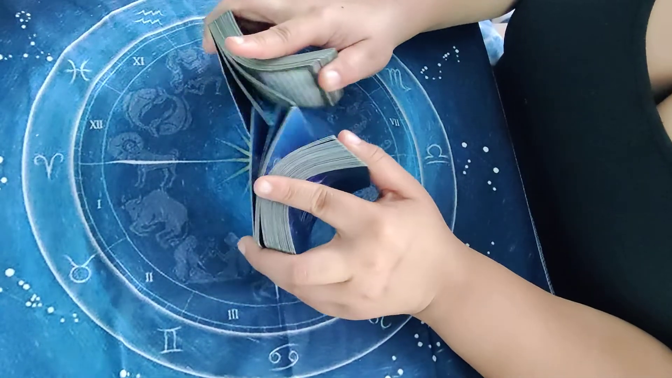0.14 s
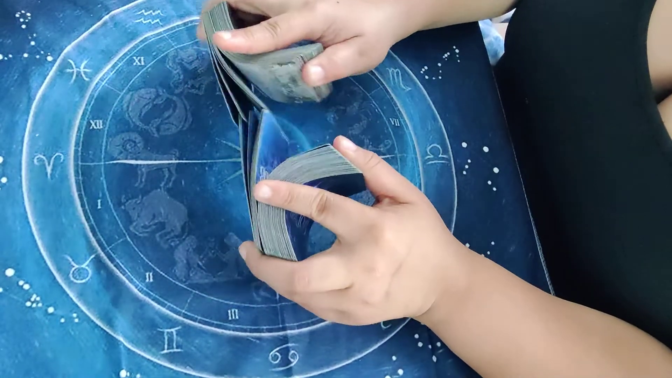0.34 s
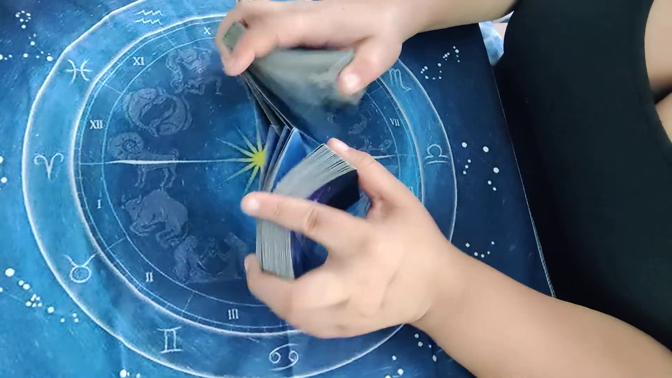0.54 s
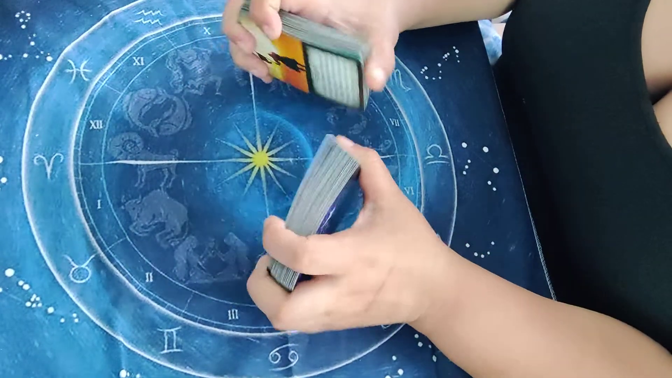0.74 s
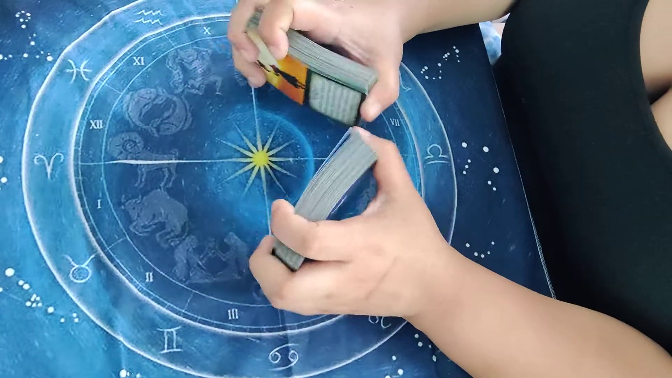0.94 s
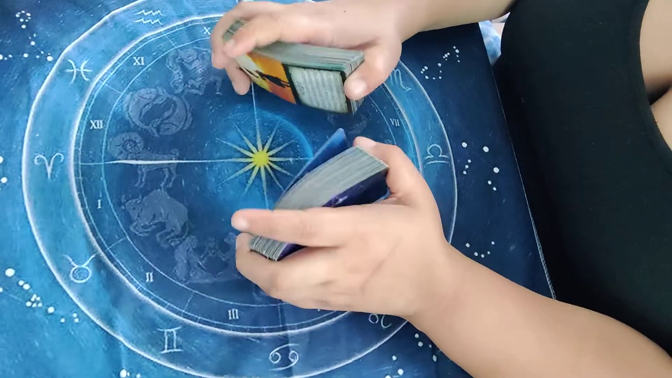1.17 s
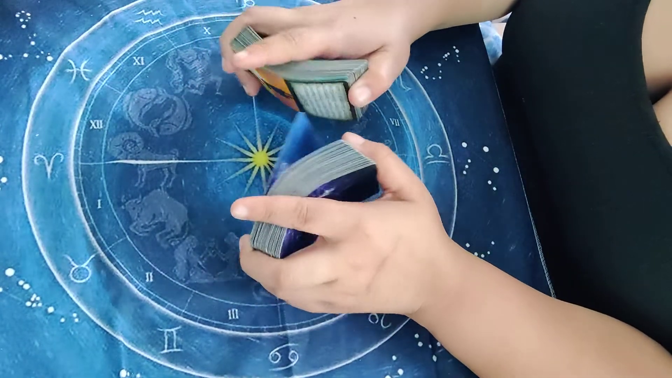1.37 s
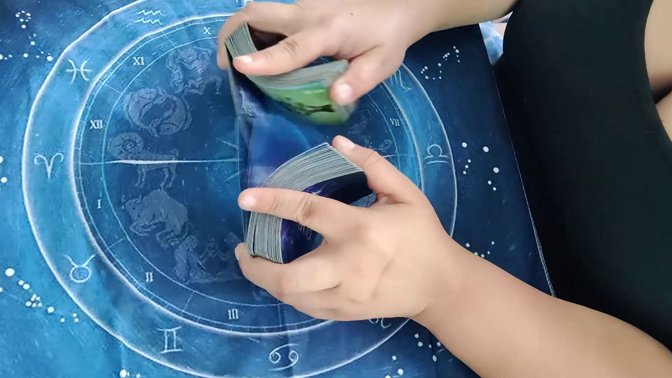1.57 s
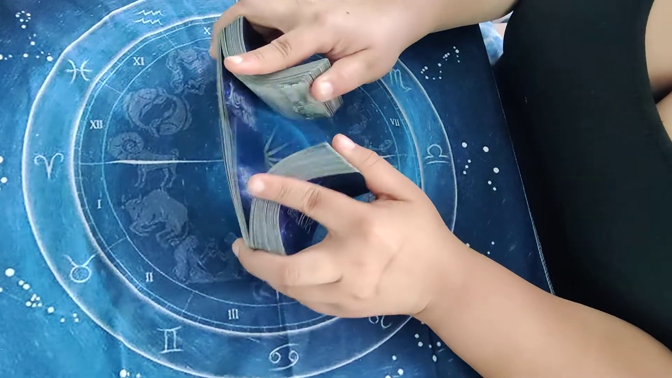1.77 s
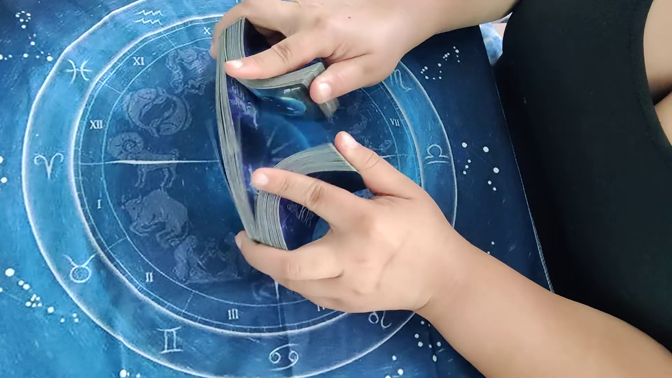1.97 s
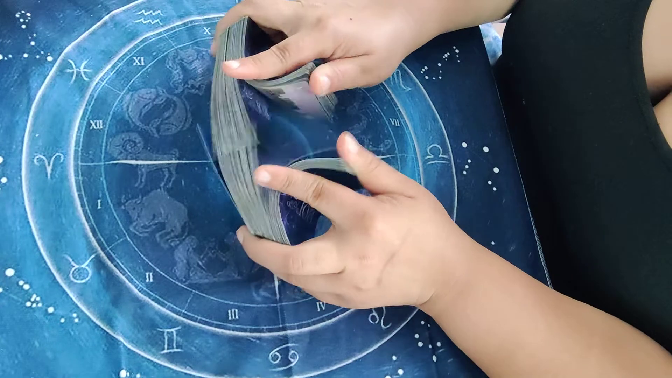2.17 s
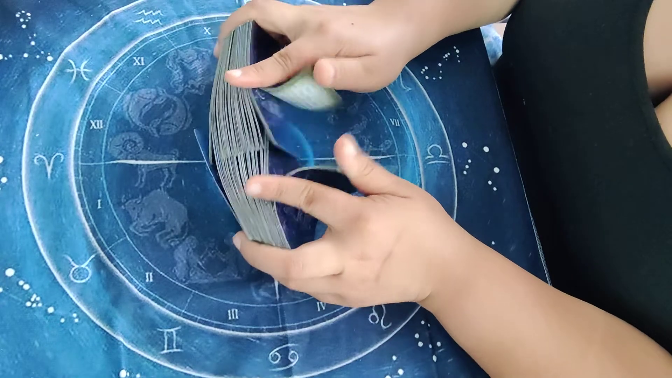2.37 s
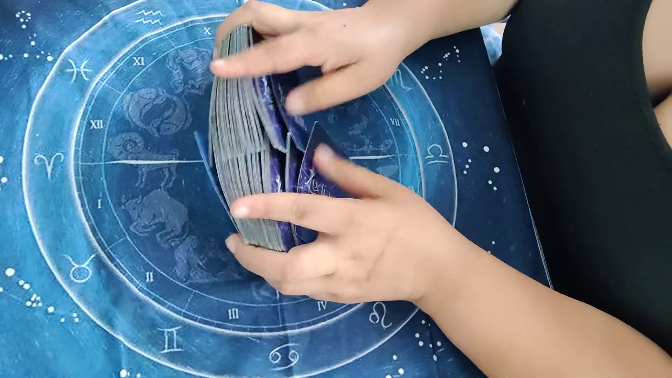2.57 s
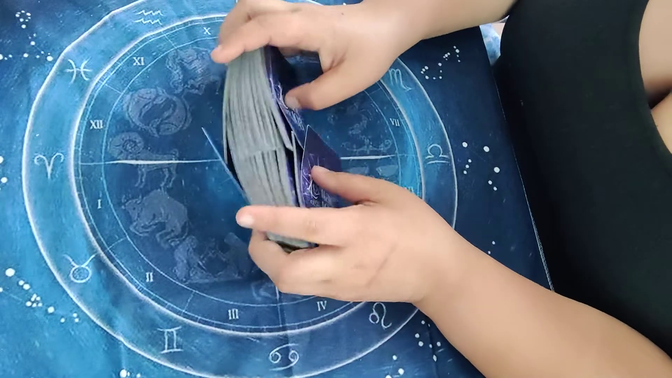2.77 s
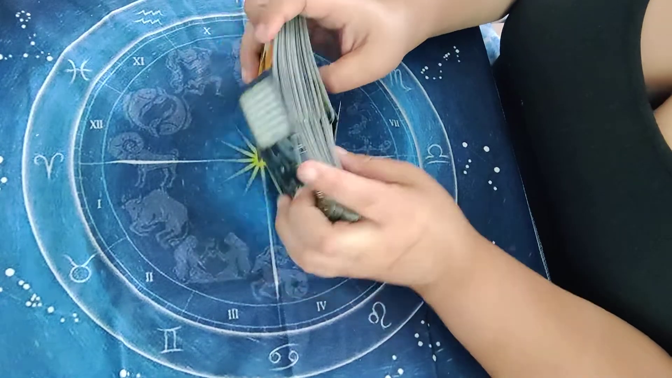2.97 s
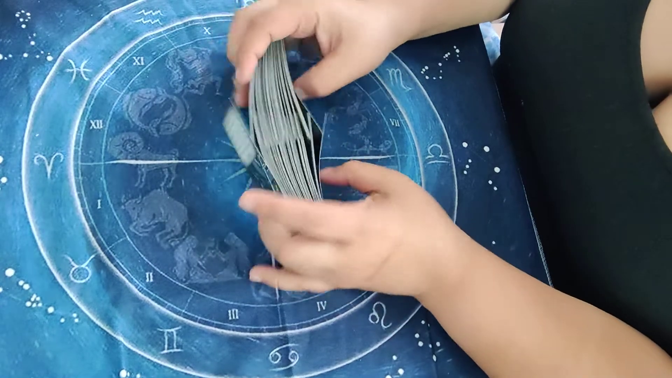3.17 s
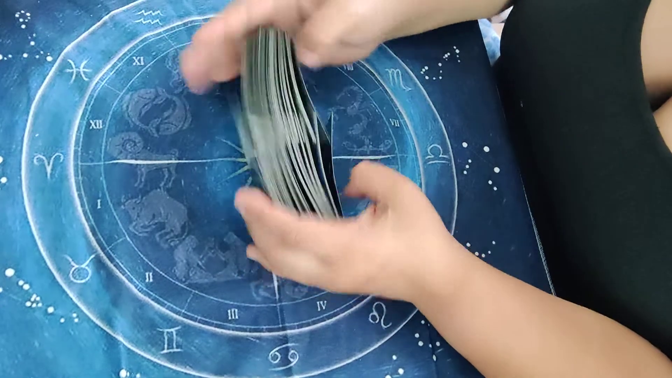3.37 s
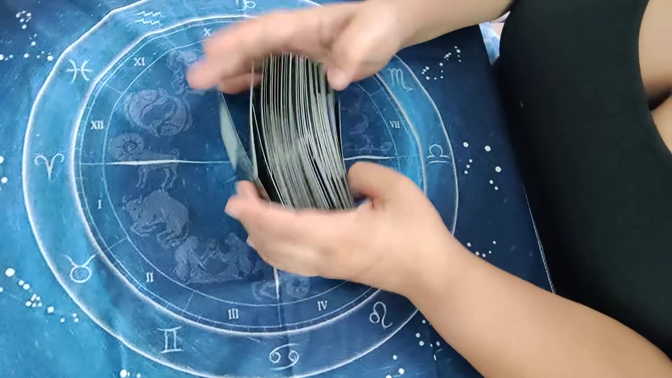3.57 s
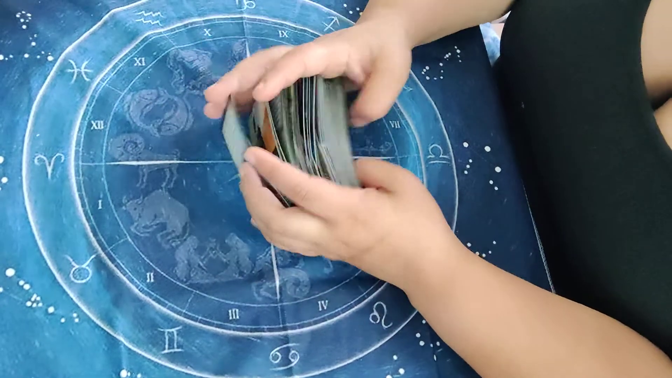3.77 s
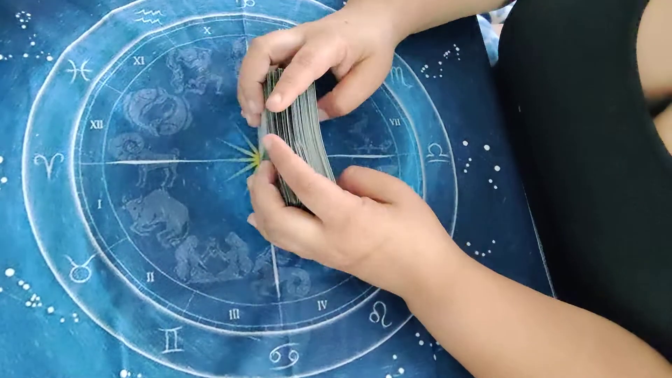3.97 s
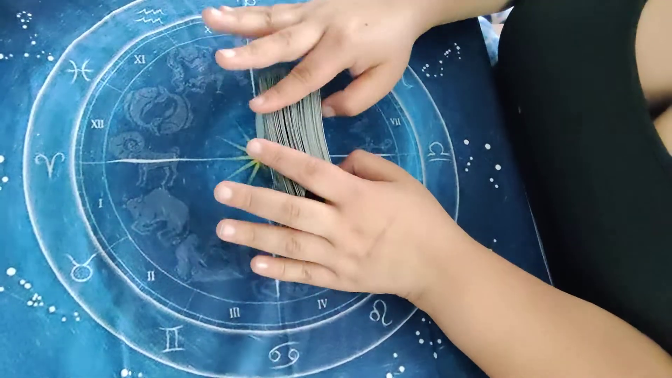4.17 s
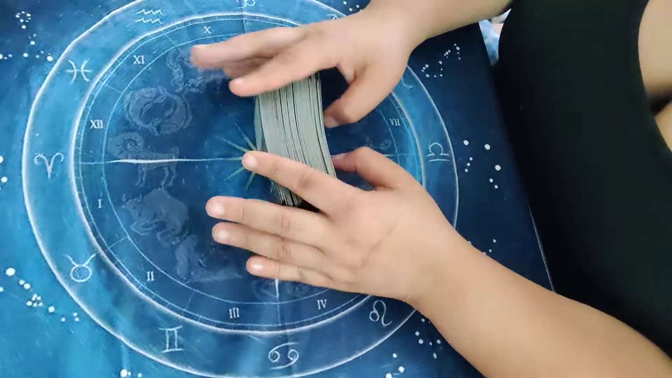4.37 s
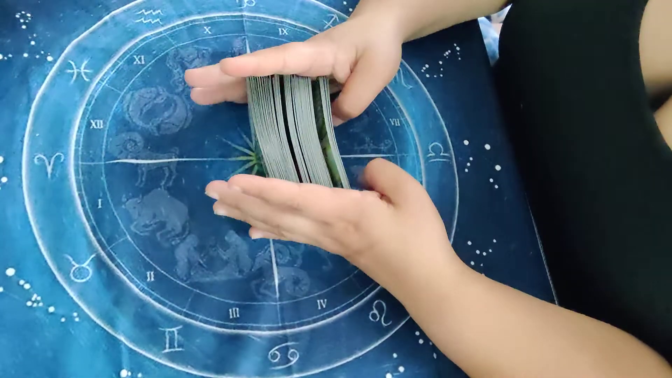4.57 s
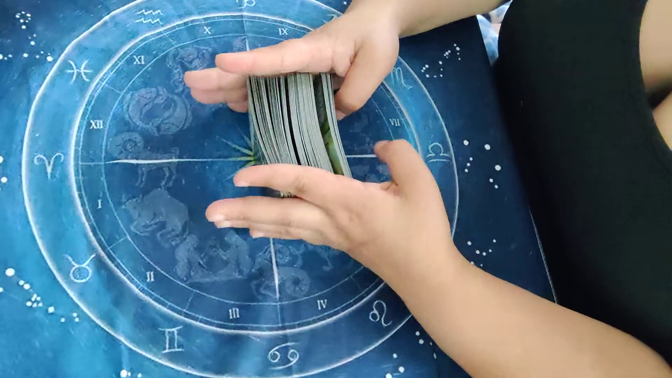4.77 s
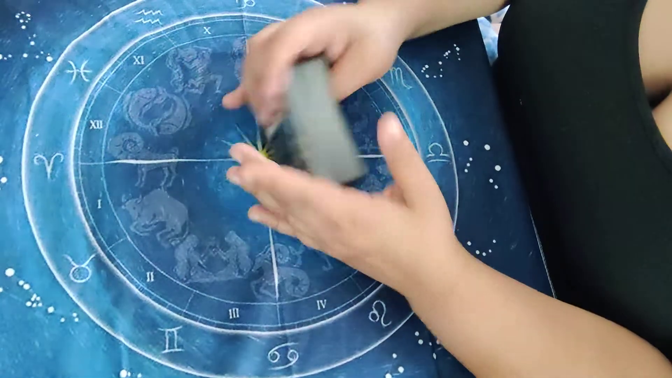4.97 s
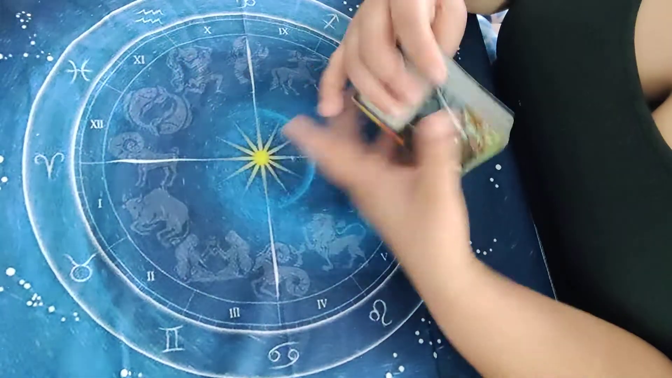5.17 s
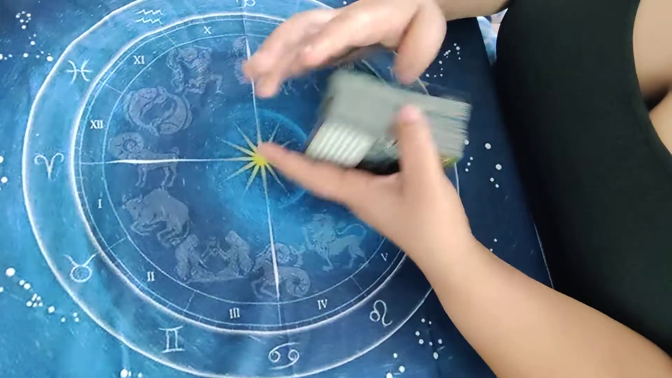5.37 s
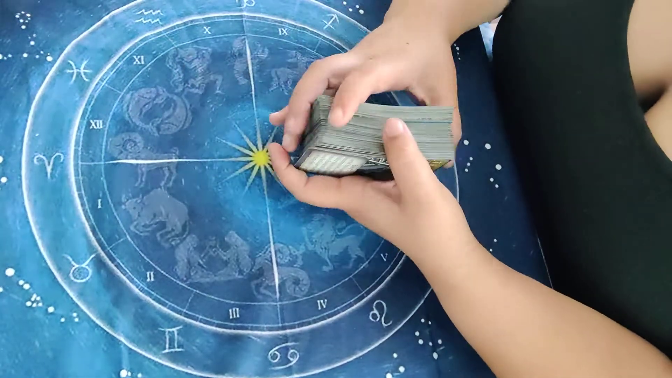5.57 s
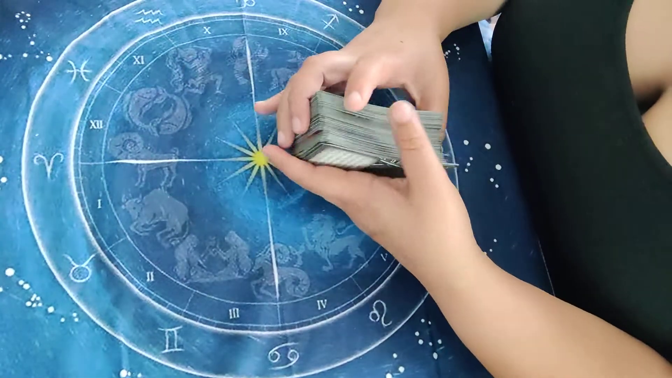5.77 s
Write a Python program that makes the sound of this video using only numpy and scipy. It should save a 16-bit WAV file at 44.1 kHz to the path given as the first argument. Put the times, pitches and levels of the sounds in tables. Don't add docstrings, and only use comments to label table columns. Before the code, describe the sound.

Two hands shuffle a thick deck over a cloth-covered table: brief crisp flicks, near silence, more scattered flicks, then a rapid rattling riffle that ends abruptly. Soft knocks and short card hisses follow as the packets are pressed together, then faint taps, small corner clicks and creeping fingers. Recorded close and dry, with brief hard-walled reflections and a barely audible low hum.

```python
import sys
import numpy as np
from scipy import signal
from scipy.fft import rfft, irfft
from scipy.io import wavfile
from scipy.ndimage import uniform_filter1d

SR = 44100
rng = np.random.default_rng(int(sys.argv[2]) if len(sys.argv) > 2 else 0)


def gain_from_decibels(decibels):
    exponent = np.asarray(decibels, float) / 20
    return 10 ** exponent


def master_out(mix):
    frames = np.transpose(np.atleast_2d(mix))
    ceiling = np.clip(frames, -1, 1)
    pcm = np.round(ceiling * 32767).astype(np.int16)
    wavfile.write(sys.argv[1], SR, pcm)


N = 257257


def evened(x):
    return x / np.sqrt(np.mean(x ** 2) + 1e-20)


def read(points, hz):
    f, value = np.transpose(points)
    return np.interp(np.log(hz + 1), np.log(f + 1), value)


def at(table, s):
    time_s, *columns = np.transpose(table)
    return [np.interp(s, time_s, column) for column in columns]


def add(mix, s, sound):
    part = mix[round(s * SR):][:len(sound)]
    part += sound[:len(part)]


def resonate(x, hz, width_hz):
    turn = np.exp(2j * np.pi * np.cumsum(hz * np.ones(len(x))) / SR)
    r = np.exp(-np.pi * abs(width_hz) / SR)
    return 2 * (turn * signal.lfilter([1 - r], [1, -r], x / turn)).real


def resonate_twice(x, hz, width_hz):
    return resonate(resonate(x, hz, width_hz), hz, 2 * width_hz)


def ring(x, modes):
    y = sum((-1) ** k * gain_from_decibels(db) * resonate(x, hz, width_hz) for k, (hz, width_hz, db) in enumerate(modes))
    return y / np.sqrt(uniform_filter1d(y ** 2, size=88).max())


def coloured(x, points):
    return evened(irfft(rfft(x) * gain_from_decibels(read(points, np.fft.rfftfreq(len(x), 1 / SR))), len(x)))


def burst(noise, rise_s, fall_s, spiky):
    t = np.arange(len(noise)) / SR - 3 * rise_s
    shape = np.where(t < 0, np.exp(-.5 * (t / rise_s) ** 2), np.exp(-t / fall_s))
    return shape * noise * abs(noise) ** spiky


def grainy(noise, grain, spread_db, limit):
    steps = np.minimum(rng.exponential(1, N // grain + 1), limit)
    return noise * gain_from_decibels(spread_db * steps).repeat(grain)[:N]


def stroke(s, rise_s, fall_s, db):
    end_db, bend = -24.5, 1.279
    t = np.arange(N) / SR - s
    away = np.where(t < 0, -t / rise_s, t / fall_s)
    return gain_from_decibels(db + end_db * np.minimum(away, 3) ** bend)


def drone():
    # (time [s], level [dB])
    load = [(0.0, -80.5), (0.1, -67.5), (0.41, -58.5), (0.83, -71.5), (1.2, -60.5), (1.56, -77), (1.7, -54),
            (2.22, -56), (2.269, -64.5), (2.58, -53.5), (3.04, -79), (3.09, -67.5), (3.23, -71),
            (3.31, -53.5), (3.39, -64), (4.97, -72), (5.54, -58), (5.83, -66)]
    # (frequency [Hz], width [Hz], level [dB])
    fuzz = [(123.62, 9.3, -73.5), (167.89, 13, -78), (252.5, 4, -74.5), (275.85, 5.3, -75)]
    # (frequency [Hz], density [dB per Hz])
    air = [(30, -16), (76, -4), (101, -1.5), (167, -13), (261, -8), (332, -16.5), (443, -15), (562, -23),
           (1420, -27.5), (1840, -29), (7280, -40), (12300, -47), (13500, -59)]
    tone_hz, waver_hz, waver_db = 85.764, 1.2, 1.8
    air_db, bands_waver_db, bands_follow = -69, 3, .3
    sway = [evened(uniform_filter1d(uniform_filter1d(v, size=1500), size=1500))
            for v in rng.standard_normal((2, N))]
    load_db, = at(load, np.arange(N) / SR)
    level = gain_from_decibels(load_db + waver_db * sway[0])
    phase = 2 * np.pi * np.cumsum(tone_hz + waver_hz * sway[1]) / SR
    tone = np.sqrt(2) * level * np.sin(phase)
    noise = rng.standard_normal((2, N))
    bands = sum(gain_from_decibels(db) * evened(resonate_twice(noise[0], hz, width_hz)) for hz, width_hz, db in fuzz)
    bands = bands * gain_from_decibels(bands_waver_db * sway[0] + bands_follow * (load_db - load_db.mean()))
    return tone + bands + gain_from_decibels(air_db) * coloured(noise[1], air)


def card(slip, crack, hz, slap_db, snap_db, fizz_db, thud_db, width_hz, bend, lower_db, first_db, second_db):
    # (frequency [Hz], width [Hz], level [dB])
    corners = [(4513, 750, 0.5), (5526, 790, 1.5), (6803, 800, 0)]
    edge = ring(resonate_twice(slip, hz, 1300), [(hz, width_hz, 0)])
    low_hz = .8 * hz
    edge = edge - gain_from_decibels(lower_db) * ring(resonate_twice(slip, low_hz, 900), [(low_hz, 400, 0)])
    high_pass = signal.butter(3, 500, "high", fs=SR, output="sos")
    thin = signal.sosfilt(high_pass, resonate(slip, 550, 2100))
    slap = ring(thin, [(615.05 * hz / 2700, 560, 0), (1500, 700, 0)])
    thud = ring(resonate(slip, 280, 710), [(134.0, 290, 0.27), (386.0, 900, -2.5)])
    modes = [(corner_hz * bend, corner_width_hz, db + more_db)
             for (corner_hz, corner_width_hz, db), more_db in zip(corners, (first_db, second_db, 0))]
    snap = ring(resonate(crack, 6400 * bend, 6100), modes)
    fizz = resonate(resonate(crack, 9700, 7900), 11000, 11000)
    fizz = ring(fizz, [(8973, 3000, 1.4), (16740, 3700, 1.2)])
    return edge + gain_from_decibels(slap_db) * (slap + gain_from_decibels(thud_db) * thud) - gain_from_decibels(snap_db) * snap + gain_from_decibels(fizz_db) * fizz


def flicks():
    # (time [s], edge ring [dB], ring [Hz], slap re ring [dB], snap re ring [dB])
    first_try = [(.068, -65, 2538, -9.5, -7), (.1245, -58.5, 2300, -7.5, 0.5),
                 (.1405, -25.5, 2950, -4, -3.5), (.1472, -21, 2889, -13, -23),
                 (.155, -25.5, 2950, -22.5, -9), (.1605, -27, 2892, -22.5, -14),
                 (.1701, -18, 2900, -15.5, -10), (.1925, -19, 2870, -10.5, -8.5),
                 (.2125, -23.5, 2870, -11.5, -4), (.229, -18, 2674, -5.5, 6), (.2395, -28, 2250, -15, -2.5),
                 (.2677, -26.5, 2448, -11.5, -1.5), (.292, -25, 2717, -1.5, -1),
                 (.301, -34, 2280, -16, -7.5), (.3108, -28.5, 2639, -9, -2.5),
                 (.3531, -52.5, 3034, -13, -15), (.3635, -44.5, 2455, 9.5, -10.5),
                 (.394, -40.5, 2770, -16, -0.5), (.4048, -11, 2609, -8, -9.5),
                 (.4155, -25, 2650, -14, -8.5), (.6267, -60, 2853, -5.5, -10), (.6364, -46, 2529, -9, -9.5),
                 (.645, -57, 2240, -22.5, -9.5), (.7175, -53, 2820, -22, -21),
                 (.7294, -51, 2800, -11.5, 0.5)]
    second_try = [(1.631, -56.5, 2524, 0.5, 0.5), (1.6483, -19.5, 2925, -14.5, -2.5),
                  (1.6895, -30.5, 2930, -8.5, -2), (1.6995, -26, 2937, -9, 1), (1.7147, -28, 2737, -12, -8),
                  (1.7541, -20, 2827, -8.5, 0), (1.7713, -45, 2915, -14, -2), (1.814, -36, 2965, -6, 0.5),
                  (1.8197, -38.5, 3147, -9.5, 5.5), (1.8382, -41.5, 2912, 1.5, 3.5),
                  (1.904, -50.5, 1798, -4, -2), (1.9258, -46, 2707, 2, 2.5), (1.936, -51, 2894, -7.5, -1),
                  (1.9473, -55, 3120, -2.5, 1), (1.9563, -46, 2308, 0, -8.5),
                  (1.975, -57, 2293, -2.5, -3.5), (1.9965, -38, 2517, -3, -5.5),
                  (2.0069, -38, 1966, -4, -0.5), (2.022, -31, 2952, -6.5, -4)]
    riffle = [(2.036, -23, 3226, -16, -14.5), (2.0408, -12.5, 3050, -9.5, 3), (2.0684, -13, 3190, -8, 0),
              (2.077, -20.5, 3120, -14, -2), (2.0871, -22.5, 3004, -14.5, -6.5),
              (2.1061, -14.5, 3150, -14, 4), (2.116, -24, 2972, -11.5, -4.5),
              (2.1413, -26.5, 3135, -2.5, 0), (2.145, -24, 2606, -11.5, 0), (2.1505, -23, 3312, -16.5, 7),
              (2.1629, -23, 2388, 1, 1.5), (2.1821, -25, 2531, -2, -8), (2.1979, -21, 2641, -4, 1.5),
              (2.2144, -33.5, 3053, -19.5, -10.5), (2.2273, -15, 2690, -23, 3),
              (2.2442, -28.5, 2400, 0.5, -4), (2.251, -27, 2809, 3, -0.5), (2.254, -30.5, 2463, -4, 2),
              (2.2755, -16, 2349, -15, 0), (2.282, -19.5, 2636, -4.5, -5), (2.2859, -19.5, 2329, -10, 6),
              (2.295, -25, 2512, 0.5, -5), (2.317, -14, 2744, -8.5, -1), (2.327, -22, 2400, -11.5, -5),
              (2.331, -18, 2230, -2, 1.5),
              (2.385, -31, 2726, 2.5, -6.5), (2.3998, -20, 4240, -5, -5.5),
                  (2.4067, -28, 2630, -5.5, -5.5), (2.4189, -18, 2867, 0.5, 1.5),
                  (2.426, -18, 3085, -6.5, -10), (2.4392, -18.5, 2220, -8, -16.5),
                  (2.4573, -23.5, 2046, 1.5, -12.5), (2.461, -22.5, 2200, -3.5, -3),
                  (2.4633, -18.5, 3030, -4, -6.5), (2.499, -35, 2510, -26, -28),
                  (2.5129, -21.5, 2330, -6.5, -5.5), (2.5335, -21.5, 2400, -1, -7.5),
                  (2.5374, -15.5, 2492, -4, -8), (2.541, -26.5, 2420, -2.5, -4),
                  (2.548, -26.5, 2800, -1.5, -1.5), (2.5521, -19, 3022, -2, -0.5)]
    catches = [
        (5.01, -68.5, 2800, 4, 14),
        (5.0332, -55, 2610, 4.5, 1),
        (5.394, -62.5, 2220, -3, -4),
        (5.4968, -55.5, 2300, -3, 2),
        (5.506, -51, 3190, -6, -1.5),
        (1.362, -71, 2500, -8.5, -20.5),
        (5.436, -71, 5600, -15, -8),
    ]
    doubles = [(2.0433, -18, 3740, -12.5, 0.5), (2.048, -24, 2943, -18.5, -9.5),
               (2.2838, -25, 2800, -13.5, 3), (2.334, -28.5, 2550, -2.5, 3.5),
               (2.5553, -20.5, 2929, -23.5, -1.5), (4.2906, -54.5, 3000, -1, -10.5),
               (2.5048, -38, 2503, -7, 5), (2.529, -35.5, 2498, -9.5, 5.5), (0.1502, -24, 2994, -18, -16),
               (5.426, -69, 6700, -20, -15), (5.469, -70, 2400, -8, -9), (5.5112, -64, 2345, -5.5, 1)]
    # (time [s], thud re slap [dB], corner fizz re snap [dB],
    # edge ring width [Hz], corner pitch [ratio])
    pile = [(0, -11, -2, 420.2, 1.03), (.22, -13.5, -7.5, 449.1, 1.01), (.4, -18, -13, 763.2, 0.93),
            (1.599, -6, -7, 450, 1.004), (2.02, -8, 1, 807.6, 0.89886), (2.041, -11.5, -10, 899, .97),
            (2.071, -16, -12.5, 903.5, .97), (2.11, -13.5, -19.5, 1004, .97), (2.15, -5.5, -5, 796.3, 1.03),
            (2.23, -7.5, -5.5, 500, 1.01), (2.32, -9.5, -3.5, 503.4, 1.01), (2.4, -11.5, -2.5, 802.6, .9),
            (2.42, -7.5, -2.5, 800, 0.94), (2.6, -16, -6.5, 599.4, 0.98)]
    # (time [s], lower edge ring re ring [dB], lowest corner ring [dB], middle corner ring [dB])
    thumbs = [(.14, -8, -4, -1.5), (.19, -8, -3, -1), (.229, -9, 1.5, -1), (.24, -4, 0.5, -3.5),
              (.31, -7.5, -1.5, -9), (.405, -17, 1.5, 1), (1.649, -18, -2.5, 1), (1.699, -8, -0.5, 4),
              (1.754, -8.5, 0, -1.5), (2.04, -8.5, 6, 2), (2.068, -11, 2.5, 3), (2.106, -7.5, 2, 2.5),
              (2.15, -11, -1, -0.5), (2.198, -9.5, 2.5, -3.5), (2.227, -16.5, -3, -2.5),
              (2.276, -7, 3.5, -3), (2.286, -12, 0, -4), (2.317, -15, -6, -3.5), (2.331, -13, 0, -2),
              (2.399, -9.5, 1.5, -3), (2.419, -10.5, -3, -5), (2.46, -10.5, -3, -4.5),
              (2.553, -11, -3.5, -1.5)]
    # (time [s], length re a clean flick [ratio])
    drag_points = [(.14, 1.3), (.17, 1.4), (.1925, 1.4), (.229, .9), (.27, 1.5), (.31, 1.5), (.405, .8),
                   (.416, 1.5), (1.649, .9), (1.699, 1.7), (1.715, 1.3), (1.754, .8), (1.815, 1.6),
                   (2.02, 1.2), (2.041, 1.1), (2.068, .9), (2.106, 1.2), (2.143, 1.5), (2.1505, 1.1),
                   (2.163, 1.7), (2.198, 1.7), (2.227, .9), (2.25, 1.5), (2.286, 1.1), (2.295, 1.6),
                   (2.317, .9), (2.331, 1.6), (2.399, 1.2), (2.419, .7), (2.44, 1.1), (2.46, 1.4),
                   (2.513, 1.6), (2.553, 1.3), (4.29, .7)]
    clean_tick, crack_s = 2.6, 0.0019
    near, spread = np.zeros((2, N))
    tick = signal.unit_impulse(900)
    cards = first_try + second_try + riffle + catches + doubles
    for s, db, hz, slap_db, snap_db in cards:
        noise = rng.standard_normal(900)
        thud_db, fizz_db, width_hz, bend = at(pile, s)
        lower_db, first_db, second_db = at(thumbs, s)
        drag = np.clip(at(drag_points, s)[0], .5, 2.5)
        release = round(170 * drag)
        slip = burst(noise, rise_s=0.0012 * drag, fall_s=0.0016 * drag, spiky=0.48)
        slip = slip + clean_tick / drag * signal.unit_impulse(len(noise), idx=release)
        crack = slip * np.exp(-abs(np.arange(len(noise)) - release) / SR / crack_s / drag)
        colour = hz, slap_db, snap_db, snap_db + fizz_db, thud_db, width_hz, bend
        flick = card(slip, crack, *colour, lower_db, first_db, second_db)
        peak_s = uniform_filter1d(flick ** 2, size=44).argmax() / SR
        add(near, s - peak_s, gain_from_decibels(db - 4.5) * flick)
        even = card(tick, tick, *colour, lower_db - 3.0, first_db, second_db)
        add(spread, s, gain_from_decibels(db - 4.0) * even)
    return near, spread


def slides():
    # (loudest time [s], rise [s], fall [s], hiss [dB], body re hiss [dB])
    strokes = [(0.29, 0.111, 0.135, -51.5, -5.5), (0.727, 0.053, 0.0296, -58, 2),
               (1.95, 0.2755, 0.198, -86, -46.5), (2.229, 0.2684, 0.172, -30, -4),
               (2.488, 0.234, 0.163, -39, -1), (3.005, 0.232, 0.03482, -69.5, 6.5),
               (3.11, 0.13, 0.0432, -71.5, 8), (3.25, 0.03667, 0.077, -66, 3),
               (3.303, 0.0215, 0.0772, -58.5, 13.5), (3.495, 0.0456, 0.033, -73, 24),
               (3.532, 0.0186, 0.0982, -42.5, -10.5), (3.584, 0.0176, 0.027, -44, -4),
               (3.67, 0.302, 0.088, -76.5, 16), (3.78, 0.023, 0.033, -55.5, -1),
               (3.816, 0.046, 0.0315, -44, -6.5), (3.949, 0.0212, 0.096, -58, -1.5),
               (4.207, 0.00665, 0.015, -65.5, -10), (4.29, 0.0273, 0.129, -68, 15.5),
               (5.039, 0.021, .07, -67.5, -11), (5.121, 0.084, 0.28, -80, 8.5),
               (5.32, 0.124, 0.4, -79.5, 8.5), (5.436, 0.0408, 0.0145, -65, -8.5),
               (5.5, 0.094, 0.1192, -71, 3.5), (5.65, 0.147, 0.1682, -78, 4)]
    # (frequency [Hz], density [dB per Hz])
    hiss_points = [(1470, -32), (2500, -3), (3710, -5), (6550, -2), (7730, -5.5), (14900, -15.5),
                   (16000, -21.5), (16500, -65.5)]
    body_points = [(300, -28), (600, -4), (1400, -9), (2600, -5.5), (3400, -13), (5000, -39.5)]
    grit = grainy(rng.standard_normal((2, N)), grain=40, spread_db=2.1, limit=5)
    hiss, body = coloured(grit[0], hiss_points), coloured(grit[1], body_points)
    return sum(stroke(s, rise_s, fall_s, db - 8.5) * (hiss + gain_from_decibels(body_db) * body)
               for s, rise_s, fall_s, db, body_db in strokes)


def taps():
    # (time [s], peak [dB], knock [Hz], face re knock [dB], edge re knock [dB])
    hits = [(2.983, -65, 333.7, 4, -4), (3.231, -61, 279, 5, -12.5), (3.268, -53.5, 274.8, 0.5, -15),
            (3.296, -53.5, 324.8, -0.5, -47.5), (3.461, -55.5, 303.4, 0.5, -27.5),
            (3.495, -47.5, 292, -4.5, -22), (3.691, -55, 293, -1, -31.5), (3.773, -51, 275.9, -17, -16.5),
            (3.948, -69.5, 222, 4, 2.5), (4.2, -57, 293.4, -13.5, -32), (4.237, -57, 347.6, -16, -24.5),
            (4.25, -57.5, 283, -4, -21), (4.287, -55, 336, -7.5, -3.5), (5.0303, -53, 278.7, -9, -19.5),
            (5.435, -75, 243.9, -23, -12.5)]
    # (frequency [Hz], width [Hz], level [dB])
    face_modes = [(550, 636, 16.5), (1057.7, 140, -18), (1342, 114, 8), (1773.2, 160, 7.5)]
    edge_modes = [(2220, 73, 12), (3190, 400, 1)]
    out, t = np.zeros(N), np.arange(5000) / SR
    push = np.diff(np.exp(-.5 * ((t - .0045) / 0.000404) ** 2), prepend=0)
    for s, db, hz, face_db, edge_db in hits:
        blow = burst(rng.standard_normal(len(t)), rise_s=0.00072, fall_s=0.0129, spiky=0.096)
        blow = blow + 9 * signal.unit_impulse(len(t), idx=105)
        knock = ring(push, [(167, 24, 4), (hz, 55, 0)])
        face = ring(resonate(resonate(blow, 460, 1600), 350.0, 1300), face_modes)
        edge = ring(resonate(resonate(blow, 3500, 2500), 1900, 2900), edge_modes)
        add(out, s + 0.000211, gain_from_decibels(db + 2.0) * (knock + gain_from_decibels(face_db) * face + gain_from_decibels(edge_db) * edge))
    return out


def blows():
    # (frequency [Hz], level [dB], t60 [s])
    drop_modes = [(159.2, 3, 0.084), (318, 7, 0.0458), (749, -12, 0.058), (963.4, -3.5, 0.0465),
                  (1042, -2, 0.023), (1346.6, -8, 0.0684), (1643, -15.5, 0.038), (2010, -13.5, .03)]
    shove_modes = [(280.6, -2, 0.088), (952, 2, 0.0161), (1310, -10.5, 0.0426), (1678, -3, 0.029),
                   (2400, -11.5, 0.049), (2800, -11.5, 0.028), (3564, -14, 0.0224)]
    palm_modes = [(1108, 6.5, 0.0222), (1739, -4.5, .04), (2310, -10, .06), (2670, -13, 0.027244),
                  (3370, -5.5, 0.031), (4520, -9, 0.022)]
    corner_modes = [(627, 11.5, 0.0205), (2220, 2.5, 0.072), (2912, -10.5, 0.0447), (3114.2, -0.5, 0.055),
                    (3456, -4, 0.057), (5003, -23, 0.049)]
    # (time [s], level [dB], rise [s], modes)
    contacts = [(3.2985, -34, 0.00078, drop_modes), (3.486, -40, 0.00065, shove_modes),
                (4.288, -53, 0.00048, palm_modes), (5.4975, -58, 0.00067, corner_modes)]
    unevenness = .65
    out, t = np.zeros(N), np.arange(SR // 4) / SR
    for s, db, rise_s, modes in contacts:
        grip = uniform_filter1d(rng.standard_normal((len(modes), len(t))), size=300, axis=1)
        grip = 1 + unevenness * np.minimum(t / 0.005, 1) * evened(grip)
        rung = np.zeros(len(t))
        for k, (hz, level_db, t60_s) in enumerate(modes):
            mode = gain_from_decibels(level_db - 60 * t / t60_s) * np.sin(2 * np.pi * hz * t)
            if hz > 400:
                mode = mode * grip[k]
            rung += (-1) ** (k + 1) * mode
        add(out, s, gain_from_decibels(db) * (1 - np.exp(-t / rise_s)) * rung)
    return out


def creep():
    # (loudest time [s], rise [s], fall [s], level [dB], band [Hz], width [Hz])
    rubs = [
        (4.8, 0.72, 0.39, -80, 1378, 160),
        (5.25, 0.47, 0.384, -80, 1409, 181.2),
        (4.75, 0.45, .3, -91.5, 2350, 250.6),
        (4.75, 0.52, .3, -90.5, 3107, 350),
        (5.4, 0.5, .45, -77, 2871, 502),
        (5.47, .15, .25, -78, 2250, 149.7),
    ]
    grit = grainy(rng.standard_normal(N), grain=300, spread_db=1.747, limit=4)
    return sum(stroke(s, rise_s, fall_s, db) * evened(resonate_twice(grit, hz, width_hz))
               for s, rise_s, fall_s, db, hz, width_hz in rubs)


def walls(x):
    # (delay [s], level [dB])
    echoes = [(.0045, -19), (0.0095, -31.5), (0.012, -23.5), (0.02, -25), (.026, -26)]
    out = np.zeros(N)
    for s, db in echoes:
        add(out, s, gain_from_decibels(db) * resonate(x, 6000, 15000))
    return out


def room(x):
    # (frequency [Hz], t60 [s])
    decay = [(150, 0.55), (660, 0.23), (1740, 0.2512), (4590, 0.22), (12100, 0.2)]
    # (frequency [Hz], level [dB])
    colour = [(100, -6.5), (350, -6.5), (700, 0), (1500, 0.5), (2500, -4.5), (4000, -0.5), (7000, -4.5),
              (8000, -4), (14000, -2.5)]
    count = SR // 2
    t, out = np.arange(count) / SR, np.zeros(N)
    turn = 2 * np.pi * 7 * np.arange(N) / SR
    for k in range(3):
        sparse = rng.choice([-1., 1.], count) * (rng.random(count) < .08)
        sparse = sparse * np.clip((t - .006) / 0.00017, 0, 1)
        hz, frame_s, z = signal.stft(sparse, SR, nperseg=256)
        fall_db = -60 * frame_s / read(decay, hz)[:, None]
        late = gain_from_decibels(0.44 * fall_db - 19.5) * np.clip(hz / 1200, 0, 1)[:, None] ** 2
        z *= gain_from_decibels(read(colour, hz)[:, None]) * (gain_from_decibels(fall_db) + late)
        tail = signal.istft(z, SR, nperseg=256)[1]
        share = np.sqrt(2 / 3) * np.cos(turn + k * np.pi / 3)
        out += signal.fftconvolve(x * share, gain_from_decibels(-1.5) * tail / np.linalg.norm(tail))[:N]
    return out


def scene():
    hum = drone()
    near, spread = flicks()
    rubs = slides()
    knocks = taps() + blows()
    direct = near + knocks + rubs
    tail = room(spread + gain_from_decibels(-3.0) * knocks + gain_from_decibels(-3.0) * rubs)
    return (direct + walls(direct) + tail + hum + creep())[None]


def roll_off(x):
    return signal.sosfilt(signal.butter(12, 16810, fs=SR, output="sos"), x)


def record(dry):
    # (frequency [Hz], width [Hz], share added [ratio])
    housing = [(3706, 440, -.3), (3843, 270, 0.16), (5506, 110, -0.63), (5600, 220, .5), (6700, 500, 0.31),
               (8050, 250, -0.41)]
    edge_hz, leak_db = 15620, -34
    thin = signal.sosfilt(signal.butter(2, 50, "high", fs=SR, output="sos"), dry)
    thin = thin + sum(share * resonate(thin[0], hz, width_hz) for hz, width_hz, share in housing)
    rounded = 0.8589 * np.tanh(thin / 0.8485)
    edge = signal.firwin(401, edge_hz, window=("kaiser", 4), fs=SR)
    edge = edge + gain_from_decibels(leak_db) * signal.unit_impulse(401, "mid")
    return roll_off(signal.oaconvolve(rounded, edge[None], "same"))


dry = scene()
out = record(dry)
master_out(out)
```